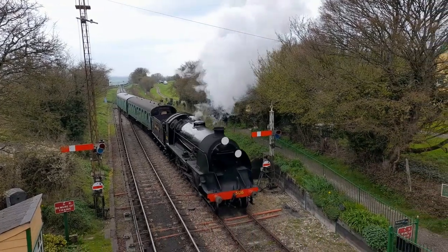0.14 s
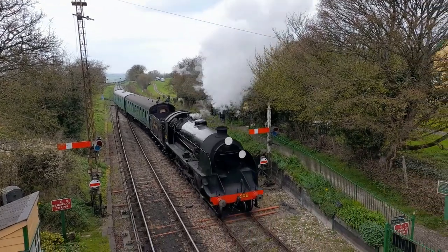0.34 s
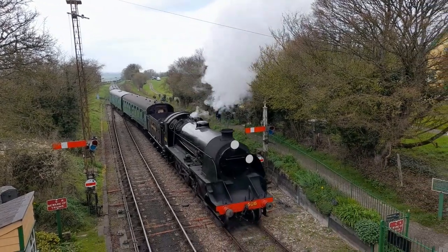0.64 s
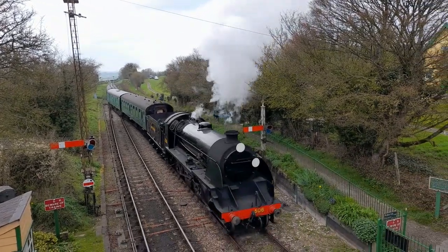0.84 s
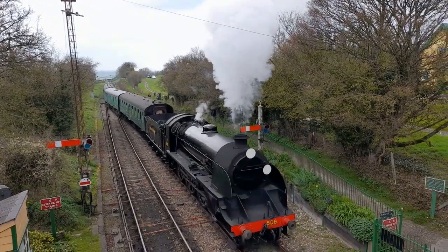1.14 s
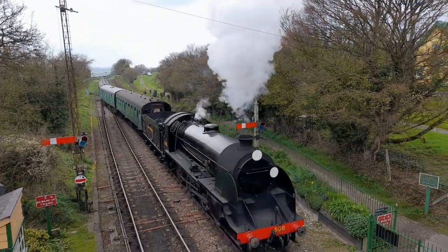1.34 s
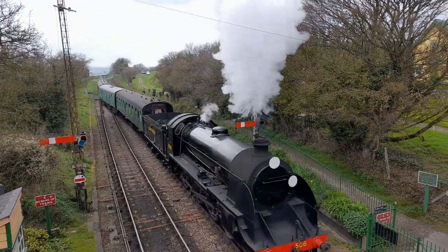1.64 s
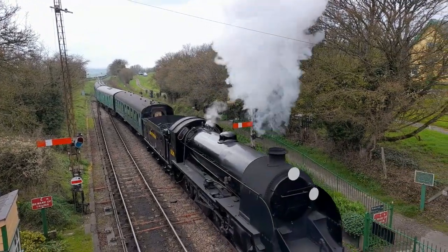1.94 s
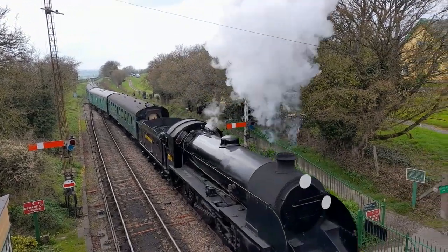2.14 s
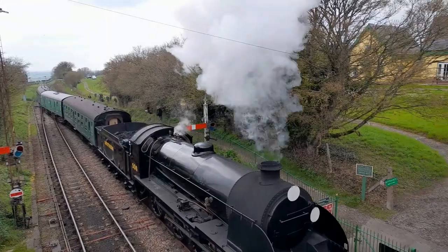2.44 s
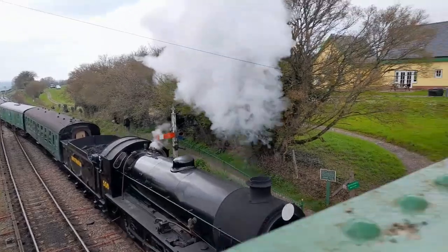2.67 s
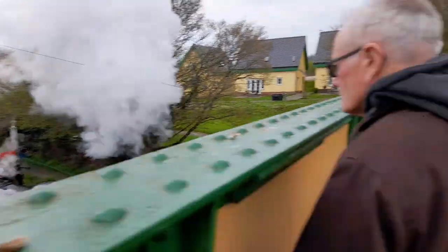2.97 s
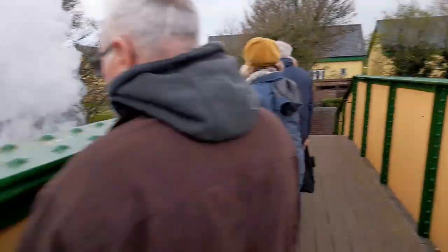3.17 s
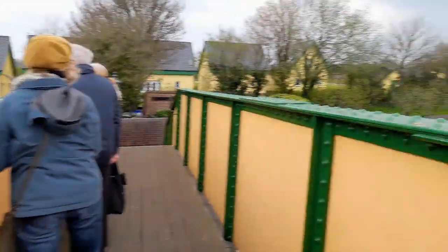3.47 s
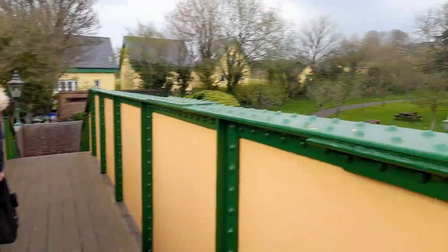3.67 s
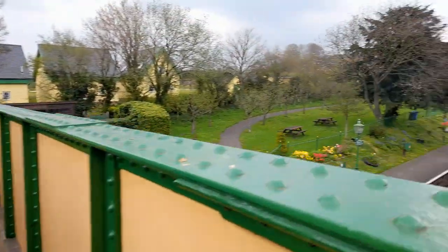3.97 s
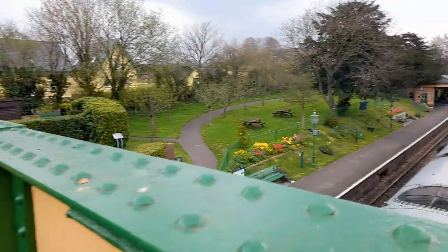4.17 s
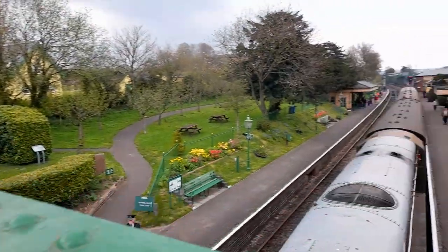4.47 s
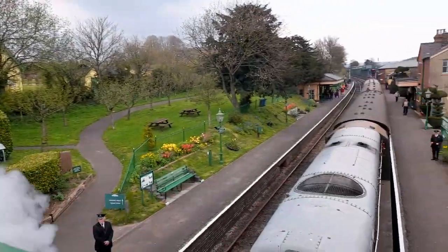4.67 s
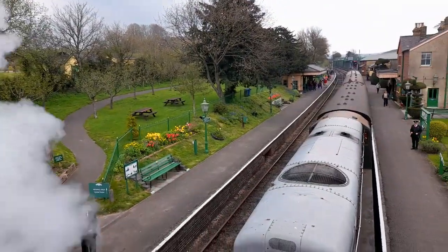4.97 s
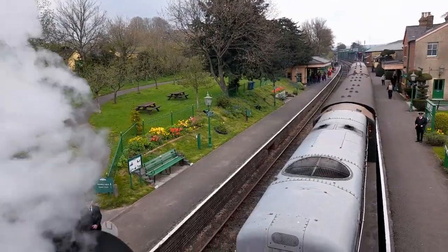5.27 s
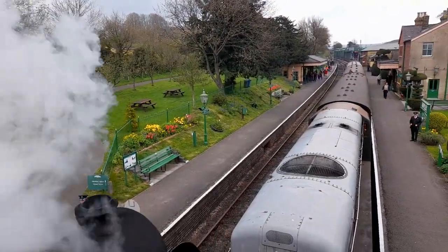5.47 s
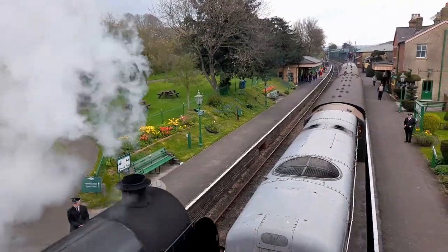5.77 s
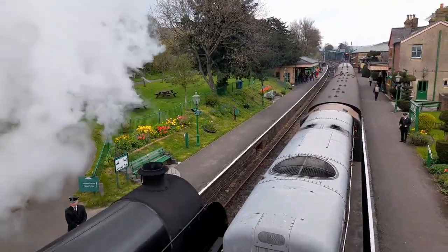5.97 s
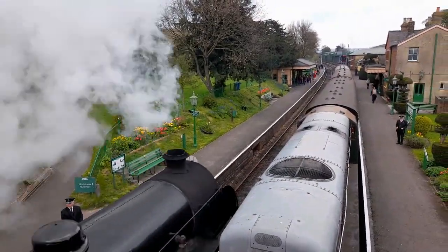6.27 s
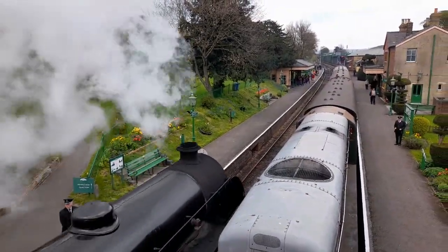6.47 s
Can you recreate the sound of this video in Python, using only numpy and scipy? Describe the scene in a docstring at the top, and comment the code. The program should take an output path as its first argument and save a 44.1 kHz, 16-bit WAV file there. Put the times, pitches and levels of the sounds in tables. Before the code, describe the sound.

A steam train works towards a footbridge outdoors, its exhaust chuffing evenly about three times a second over wheel rumble and steam hiss. Wind buffets the left side of the microphone in the first second. As the engine goes beneath, the deck dulls the treble and the chuffs boom hollowly; then crisp hiss returns. Stereo, handheld on the bridge, close above the track.

```python
"""A railway cutting with a footbridge: a steam locomotive works up to it and passes under, three beats a second.
Each beat is shaped noise, a turbulent blast from the chimney, with a boom that rings on and an echo.
Between beats the wheels rumble, steam leaks hiss and one leak sings, all made from noise.
Wind, strongest at first, buffets the left port (the listener's left side) with short thumps.
The deck screens the blast's treble; the listener's turn shifts the sound between the two ports."""
import sys
import numpy as np
from scipy import signal
from scipy.fft import rfft, irfft, next_fast_len
from scipy.io import wavfile
from scipy.ndimage import uniform_filter1d, map_coordinates

SR = 44100
rng = np.random.default_rng(int(sys.argv[2]) if len(sys.argv) > 2 else 0)


def log_audio(samples):
    """Write samples as a 16-bit WAV file to the path given in sys.argv[1]."""
    # one column per channel
    frames = np.atleast_2d(samples).T
    # limit to full scale, then quantise
    limited = np.clip(frames, -1, 1)
    pcm = np.round(limited * 32767).astype(np.int16)
    wavfile.write(sys.argv[1], SR, pcm)


N = 291942
TIME = np.arange(N) / SR
FREQS = np.fft.rfftfreq(N, 1 / SR)

# how far the bridge deck hides the engine: time_s, share (0-1)
HIDDEN = [(2.35, 0.15), (2.8, 0.34), (3.05, .48), (3.33, 0.97), (3.7, 0.84), (4.6, 0.82), (4.95, 0.3),
          (5.3, 0.08)]
# direction of the engine as the listener turns: time_s, left_lead_ms
BEARING = [(0, 0.13), (1.6, 0.033), (2.55, 0.0043), (3.15, 0.3), (3.7, 0.61), (4.4, 0.43), (5.4, .3),
           (6.62, .13)]
# spectra of the running train: pitch_hz, level_db
DEEP_RUMBLE = [(20, -38), (32, -23), (46, -7.5), (64, -2), (85, -9), (130, -7)]
RUMBLE = [(25, -41), (45, -4), (65, -0.5), (85, -2), (120, 4.5), (170, -6), (230, 0), (310, -3.5),
          (400, -9.5), (700, -38)]
WHEELS = [(220, -7), (350, -9), (520, 6.5), (700, 0), (1000, -6), (1250, -13), (1450, -6), (1850, -12),
          (2400, -16), (3200, -19.5), (6000, -31.5)]
# spectra of the steam round the cylinders and of the fine leak: pitch_hz, level_db
STEAM = [(1000, 4), (2000, -2), (3000, 6.5), (4100, 2), (4700, -2.5), (5400, -7.5), (8000, -20.5),
         (12000, -30), (16000, -34)]
LEAK = [(4000, -7), (6500, -11), (8500, -9), (10000, -1), (11500, -2.5), (13500, 5.5), (14800, -1.5),
        (16000, 0.5)]
# centre of the fine leak's hiss as the jet swings past: time_s, pitch_hz
LEAK_HZ = [(0, 11100), (2.6, 11400), (3.1, 10600), (5.1, 13100), (5.8, 11000)]
# the singing leak, before its swells: time_s, level_db
SINGING = [(0, -44), (1.4, -51), (2.6, -56), (3.95, -44.5), (4.95, -35), (5.3, -42.5), (6.6, -40)]
# spectrum of the wind: pitch_hz, level_db
WIND_LOW = [(20, -41), (50, -9), (130, -6.5), (280, -12), (450, -18), (1000, -36), (3000, -70)]
# gusts on the left port: time_s (middle of the thump), level_db
BUFFETS = [(0.055, -5), (0.116, -1.5), (0.173, -2.5), (0.351, -7.5), (0.402, -5), (0.695, -4.5),
           (0.776, -5.5), (1.103, -1.5)]
# one row for each exhaust beat: start_s, level_db, brightness_db, rasp_hz
BEATS = [(0.168, -22, 0.5, 2800), (.507, -18.5, -3, 2200), (.827, -20, 0, 3263), (1.137, -22, 1, 3200),
         (1.452, -19.5, -0.5, 1560), (1.793, -17.7, 1, 1330), (2.114, -16.4, 0.5, 1470),
         (2.415, -18.5, 1.5, 2860), (2.734, -20.5, 5.5, 2360), (3.078, -19, 2.5, 2860),
         (3.407, -18.5, 0, 2420), (3.716, -19, 0, 3520), (4.035, -18.5, -2, 2250), (4.376, -13.5, -2, 2080),
         (4.698, -15, -3, 3020), (4.999, -15.5, -1.5, 2300), (5.328, -18.5, -0.5, 2920),
         (5.672, -17, -1, 3400), (5.997, -18.5, 0, 1478), (6.311, -20.5, -7.5, 1960)]
# fixed chimney and smokebox resonances: pitch_hz, width_hz, lift_db
CHIMNEY = [(125, 30, 2), (290, 40, 2), (680, 80, 3), (900, 120, 3), (1500, 240, 4), (2150, 90, 4),
           (3050, 400, 3)]
# pitch of the bark, lowest as the chimney enters the bridge: time_s, pitch_hz
BARK_HZ = [(2.73, 660), (3.08, 345), (5.0, 490)]
# spectra of the blast's parts, from low to high: pitch_hz, level_db
BOOM = [(25, -35), (55, -6), (90, -5), (140, -0.5), (220, -0.5), (300, -5.5), (380, -18), (600, -66)]
BARK = [(200, -22), (330, -1), (420, -4), (560, -4.5), (800, -10), (1000, -16), (1400, -57)]
RUSH = [(600, -21), (1000, 4), (1250, 0.5), (1550, 3.5), (1900, 2.5), (2500, 1.5), (3200, -3)]
SIZZLE = [(1800, -79), (2650, 4.5), (3300, 4.5), (4200, -1), (5200, -19), (7500, -25), (9000, -8),
          (11000, -0.5), (13000, -2.5), (16000, -18)]
# early reflections off boiler, ground and bridge: first_delay_ms, last_delay_ms, strength (ratio)
REFLECTIONS = [(2.307, 2.7, 0.038), (6.6, 7.4, 0.14), (13.95, 12.9, 0.12), (21.45, 20.2, 0.16)]
# how long the echo of the cutting takes to fall 60 dB: pitch_hz, fall_s
CUTTING = [(100, 0.29), (300, 0.62), (1000, 0.55), (4000, 0.55), (12000, 0.24)]
# ringing of the hollow under the bridge: pitch_hz, level_db, fall_s (time to fall 60 dB)
BRIDGE = [(166, 1, 0.87), (194, -2, 0.68), (222, 6, 0.097), (293, 4, 0.27)]
# low thuds as the blasts strike the underside of the deck: start_s, level_db
THUDS = [(3.171, -6), (3.435, -10.5), (3.821, -16)]
# the ports' unequal tone: pitch_hz, left_minus_right_db
BALANCE = [(100, 0.5), (400, -1.4), (700, -2), (1300, 0.5), (2600, -1), (4000, 1.5), (5500, 5.5),
           (7800, 12.5), (10000, 5), (13000, 5.5), (15500, 7)]
# the early lift of the left port's treble: pitch_hz, lift_db
BRIGHT_LIFT = [(3500, 0.5), (5000, 6), (6500, 13.5), (8500, 13), (10000, 6), (13000, 5), (15500, 8)]

# the engine's run: its speed, its depth below the listener, and when it is right underneath
SPEED_M_PER_S, DEPTH_M, UNDER_S = 6.54, 6.53, 3.85
# share of direct sound in the open, and the most that the deck takes from it
DIRECT_OPEN, DIRECT_LOST = 0.87, 0.75
# the singing leak: mean pitch, swing either way, swings a second, time of one crest
SINGING_HZ, WARBLE_HZ, WARBLE_PER_S, CREST_S = 2858, 36.2, 4.0, 4.38
# the wind blows steadily at first, then dies away
WIND_DB, WIND_UNTIL_S, WIND_FALL_DB_PER_S = -24, 0.3, 4
# every beat booms near one pitch, give or take a share of it
BOOM_HZ, BOOM_SCATTER = 207.2, 0.11
# bark and rasp stand out more under the deck: lift in the open, further lift when hidden
BARK_OPEN_DB, BARK_HIDDEN_DB = 3.5, 9.5
RASP_WIDTH_HZ, RASP_OPEN_DB, RASP_HIDDEN_DB = 450, 3, 9.5
# the left port sounds brighter at first: when that is gone, and how long it takes to fade
BRIGHT_UNTIL_S, BRIGHT_FADE_S = 1.18, 0.095
EDGE_HZ = 15800  # top of the band


def gain_of(db):
    """Turns decibels into amplitude."""
    return 10 ** (np.asarray(db) / 20)


def evened(x):
    """Scales to an rms (average strength) of 1."""
    return x / np.sqrt(np.mean(x ** 2) + 1e-20)


def read(points, hz):
    """Reads a spectrum table, in straight lines on a log-frequency axis."""
    f, value = np.transpose(points)
    return np.interp(np.log(hz + 1), np.log(f + 1), value)


def curves(rows):
    """Turns each column of a time table into a curve with one value per sample."""
    s, *columns = np.transpose(rows)
    return [np.interp(TIME, s, c) for c in columns]


def add(mix, s, sound):
    """Mixes a sound in, starting at time s."""
    part = mix[..., max(round(s * SR), 0):][..., :sound.shape[-1]]
    part += sound[..., :part.shape[-1]]


def shape(points):
    """Gain of a spectrum table at each frequency, falling steeply beyond its ends."""
    below, above = points[0][0] / 2, points[-1][0] * np.sqrt(2)
    fall_above = 1 + (FREQS / above) ** 4
    fall_below = 1 + (below / (FREQS + 1)) ** 4
    return gain_of(read(points, FREQS)) / fall_above / fall_below


def lift(hz, width, db):
    """The bump that a resonance makes in a spectrum, in dB, at offsets hz from its centre."""
    return db / (1 + (2 * hz / width) ** 2)


def noise(gain):
    """Noise of rms 1 with the given gain at each frequency."""
    size = next_fast_len(N, True)
    gain = np.interp(np.fft.rfftfreq(size, 1 / SR), FREQS, gain)
    waves = rng.standard_normal(len(gain)) + 1j * rng.standard_normal(len(gain))
    return evened(irfft(gain * waves, size)[:N])


def flutter(rate_hz, depth_db):
    """A random gain that wanders, mostly slower than the given rate."""
    wander = np.clip(noise(1 / (1 + (FREQS / rate_hz) ** 4)), -2.5, 2.5)
    return evened(gain_of(depth_db * wander))


def narrow(hz, width_hz):
    """A fuzzy tone: a narrow band of noise that follows a pitch curve."""
    band = 1 / (1 + (2 * FREQS / width_hz) ** 2)
    turn = 2 * np.pi * np.cumsum(hz * np.ones(N)) / SR
    return evened(np.array([noise(band) * np.cos(turn) + noise(band) * np.sin(turn) for port in range(2)]))


def churned(x, depth_db):
    """Eddies in the plume lift and sink patches of the spectrum, some 300 Hz wide and 20 ms long."""
    z = signal.stft(x, SR, nperseg=512, noverlap=384)[2]
    patches = uniform_filter1d(rng.standard_normal(z.shape[1:]), size=4, axis=0)  # blur across pitch
    patches = evened(uniform_filter1d(patches, size=7, axis=1))  # blur across time
    z = z * evened(gain_of(depth_db * patches))
    return signal.istft(z, SR, nperseg=512, noverlap=384)[1][:, :N]


def hidden(t):
    """How far the deck screens the engine at time t, 0-1."""
    return np.clip(np.interp(t, *np.transpose(HIDDEN)), 0, 1)


def behind(t, turn_m=2.2):
    """Near 0 while the engine faces the listener, near 1 once it has gone by."""
    return .5 + .5 * np.tanh(SPEED_M_PER_S * (t - UNDER_S) / turn_m)


def passing(db, spread, screen_db, behind_db):
    """Gain of a part of the train: it falls with distance, and changes behind the deck and once gone by."""
    # spread: 1 for a point source, less for a long one, more for treble that the air absorbs
    distance_m = np.hypot(DEPTH_M, SPEED_M_PER_S * (TIME - UNDER_S))
    level_db = db + screen_db * hidden(TIME) + behind_db * behind(TIME)
    return gain_of(level_db) * (DEPTH_M / distance_m) ** spread


def at_ports(gain, blur_hz=900, compact=1):
    """Engine noise: the direct part reaches the left port first, scattered treble differs in each."""
    lead_ms = curves(BEARING)[0]
    # a spread-out source (low compact) has less of a direction
    direct = np.clip((DIRECT_OPEN - DIRECT_LOST * hidden(TIME) ** 2) * compact, 0, 1)
    jet = noise(gain)
    late = map_coordinates(jet, [np.arange(N) - lead_ms * SR / 1000], order=3, mode="nearest")
    alike = 1 / (1 + (FREQS / blur_hz) ** 2)  # the bass is alike at both ports
    share = np.sum(gain ** 2 * alike) / np.sum(gain ** 2)
    apart = np.array([noise(gain * np.sqrt(1 - alike)) for port in range(2)])
    scattered = np.sqrt(share) * noise(gain * np.sqrt(alike)) + np.sqrt(1 - share) * apart
    return np.sqrt(direct) * np.array([jet, late]) + np.sqrt(1 - direct) * scattered


def rolling():
    """Rumble of the heavy train, roar of wheels on rail, and a faint ring of the running gear."""
    deep = passing(db=-38.0, spread=0.22, screen_db=6, behind_db=-5.5) * at_ports(shape(DEEP_RUMBLE))
    rumble = passing(db=-28.5, spread=0.042, screen_db=1.05, behind_db=2.5) * at_ports(shape(RUMBLE))
    rumble = rumble * flutter(33, 1.0)
    wheels = passing(db=-38.0, spread=0.047, screen_db=-3.5, behind_db=4.5) * at_ports(shape(WHEELS))
    wheels = wheels * flutter(45, 1.0)
    ring = passing(db=-41.5, spread=0.59, screen_db=-21, behind_db=-2) * narrow(2140, 110)
    return deep + rumble + wheels + ring


def leaks(beam_hz=2000, beam_db=8, surge_db=4, surge_lag_s=0.037, surge_length_s=0.048):
    """Steam escapes round the cylinders, surging with every stroke, and hisses from a fine leak."""
    surge = sum(np.exp(-((TIME - row[0] - surge_lag_s) / surge_length_s) ** 2) for row in BEATS)
    steam = gain_of(surge_db * surge) * at_ports(shape(STEAM), compact=0.57) * flutter(29.5, 1.0)
    steam = steam * passing(db=-36.0, spread=0.53, screen_db=-15, behind_db=3.5)
    # a broad bump moves through the hiss as the jet swings past
    hz, t, z = signal.stft(at_ports(shape(LEAK), compact=0.2), SR, nperseg=512)
    centre_hz = np.interp(t, *np.transpose(LEAK_HZ))
    z = z * gain_of(beam_db * np.exp(-((hz[:, None] - centre_hz) / beam_hz) ** 2))
    hiss = evened(signal.istft(z, SR, nperseg=512)[1][:, :N]) * flutter(42, 0.37)
    hiss = hiss * passing(db=-23, spread=1.29, screen_db=-29.0, behind_db=0.0)
    return churned(steam, depth_db=3.0) + churned(hiss, depth_db=1.8)


def singing(swell_db=1.5):
    """A leak sings at a joint: a fuzzy tone whose pitch and level rise and fall together."""
    warble = np.cos(2 * np.pi * WARBLE_PER_S * (TIME - CREST_S))
    pitch_hz = (SINGING_HZ + WARBLE_HZ * warble) * flutter(7.7, 0.0306)
    level = gain_of(curves(SINGING)[0] + swell_db * warble)
    return level * narrow(pitch_hz, 73) * flutter(9.1, 3.3)


def wind(swing_hz=140, length_s=0.0023, right_db=-17):
    """Eddies, chiefly at the left port: a lumpy rumble and a few short thumps."""
    level_db = WIND_DB - WIND_FALL_DB_PER_S * np.maximum(TIME - WIND_UNTIL_S, 0)
    left = gain_of(level_db) * noise(shape(WIND_LOW)) * flutter(25, 5.1)
    t = np.arange(-SR // 25, SR // 25) / SR
    for (s, db), (phase, size) in zip(BUFFETS, rng.random((len(BUFFETS), 2))):
        thump_hz = swing_hz * (0.92 + .5 * size)  # each thump has its own pitch
        eddy = np.exp(-(t / length_s) ** 2) * np.cos(2 * np.pi * (thump_hz * t + phase))
        add(left, s + t[0], gain_of(db) * eddy)
    return np.array([left, gain_of(right_db) * left])


def blasts(spectrum, levels_db, delay_s, rise_s, hold_s, decay_s, rough_db, rough_hz, ring_db=10, lumpy_db=1.66):
    """One part of every beat: the valve opens, the jet roars in the chimney, the cylinder empties."""
    chimney_db = sum(lift(FREQS - hz, width, db) for hz, width, db in CHIMNEY)
    jet = at_ports(shape(spectrum) * gain_of(chimney_db)) * flutter(rough_hz, rough_db)
    t = np.arange(int(.3 * SR)) / SR
    hz = np.fft.rfftfreq(len(t), 1 / SR)
    # a negative delay means that the flow is already under way at the start
    age = t - delay_s
    opening = np.sin(np.pi / 2 * np.clip(age / rise_s, 0, 1)) ** 2
    flow = opening * np.exp(-np.maximum(age - rise_s - hold_s, 0) / decay_s)
    out = np.zeros((2, N))
    booms_hz = BOOM_HZ * (1 + BOOM_SCATTER * rng.uniform(-1.03, 1, len(BEATS)))
    for (s, _, _, rasp_hz), db, boom_hz in zip(BEATS, levels_db, booms_hz):
        bark_hz = np.interp(s, *np.transpose(BARK_HZ))
        # each slug of steam stirs its own resonances, and its eddies make the spectrum lumpy
        colour_db = lift(hz - boom_hz, 50, ring_db)
        colour_db = colour_db + lift(hz - bark_hz, 64, BARK_OPEN_DB + BARK_HIDDEN_DB * hidden(s))
        colour_db = colour_db + lift(hz - rasp_hz, RASP_WIDTH_HZ, RASP_OPEN_DB + RASP_HIDDEN_DB * hidden(s))
        colour_db = colour_db + lumpy_db * evened(uniform_filter1d(rng.standard_normal(len(hz)), size=45))
        piece = jet[:, round(s * SR):][:, :len(t)]
        puff = irfft(rfft(piece, len(t), axis=1) * gain_of(colour_db), len(t), axis=1)
        add(out, s, gain_of(db) * evened(puff * flow))
    return out


def exhaust(boom_tilt=-0.48, sizzle_tilt=1.3, rush_screen_db=-15, sizzle_screen_db=-20,
            boom_rear_db=-1.04, bark_rear_db=1):
    """The sizzle rises fastest in each beat, the boom builds slowest; the deck screens only the treble."""
    s, strength_db, bright_db, _ = np.transpose(BEATS)
    boom_db = strength_db + boom_tilt * bright_db + boom_rear_db * behind(s)
    bark_db = strength_db + bark_rear_db * behind(s)
    rush_db = strength_db + bright_db + rush_screen_db * hidden(s)
    sizzle_db = strength_db + sizzle_tilt * bright_db + sizzle_screen_db * hidden(s)
    boom = blasts(BOOM, boom_db, delay_s=0.00045, rise_s=0.061, hold_s=0.025, decay_s=0.037,
                  rough_db=0.5, rough_hz=83.0)
    bark = blasts(BARK, bark_db, delay_s=-0.011, rise_s=0.052, hold_s=0.03, decay_s=0.028,
                  rough_db=0.5, rough_hz=150)
    rush = blasts(RUSH, rush_db, delay_s=-0.0024, rise_s=0.041, hold_s=0.022, decay_s=0.037,
                  rough_db=1.5, rough_hz=199)
    sizzle = blasts(SIZZLE, sizzle_db, delay_s=-0.0022, rise_s=0.031, hold_s=0.015, decay_s=0.041,
                    rough_db=2.5, rough_hz=200)
    treble = churned(gain_of(-11.0) * rush + gain_of(-15) * sizzle, depth_db=2.5)
    return gain_of(-3.0) * boom + gain_of(-8.0) * bark + treble


def reflected(x):
    """Nearby surfaces add short echoes whose delays drift as the engine moves; the bass passes round them."""
    treble = signal.sosfilt(signal.butter(1, 350, "highpass", fs=SR, output="sos"), x)
    out = x.copy()
    for first_ms, last_ms, strength in REFLECTIONS:
        then = TIME - np.linspace(first_ms, last_ms, N) / 1000
        out += strength * np.array([map_coordinates(port, [then * SR], order=3) for port in treble])
    return out


def cutting(x):
    """Banks, trees and buildings scatter the beats back; the bass returns alike at both ports."""
    size = SR // 2
    # sparse random echoes, about 2000 a second, none sooner than 30 ms
    taps = rng.standard_normal((2, size)) * (rng.random((2, size)) < 2000 / SR) * (TIME[:size] > .03)
    hz, t, z = signal.stft(taps, SR, nperseg=256)
    z = np.array([z[0], np.where((hz < 500)[:, None], z[0], z[1])])
    fading = gain_of(-60 * t / read(CUTTING, hz)[:, None])
    tail = signal.istft(z * fading, SR, nperseg=256)[1]
    return signal.fftconvolve(x, tail / np.linalg.norm(tail[0]), axes=1)[:, :N]


def bridge(x, nearest_s=3.32, spread_s=1.0, drive_db=-7):
    """Blasts close under the bridge make the space between its girders boom on."""
    t = TIME[:SR // 2]
    ring = sum(gain_of(db - 60 * t / fall_s) * np.sin(2 * np.pi * hz * t) for hz, db, fall_s in BRIDGE)
    near = x.mean(0) * np.exp(-((TIME - nearest_s) / spread_s) ** 2)
    return gain_of(drive_db) * np.std(near) * evened(signal.fftconvolve(near, ring)[:N])


def thuds(ring_hz=203, swell_s=0.0091):
    """Blasts strike the deck: each thud swells within two cycles and dies in a few more."""
    t = TIME[:SR // 8]
    thud = t / swell_s * np.exp(1 - t / swell_s) * np.sin(2 * np.pi * ring_hz * t)
    out = np.zeros(N)
    for s, db in THUDS:
        add(out, s, gain_of(db) * thud)
    return out


def scene():
    """The train, heard through two ports of unequal tone, and the wind, chiefly on the left one."""
    beats = exhaust()
    train = reflected(beats + rolling() + leaks() + singing())
    train = train + gain_of(-19.0) * cutting(beats) + bridge(beats) + thuds()
    ratio = gain_of(read(BALANCE, FREQS))
    ports = np.array([ratio, np.ones_like(ratio)]) * np.sqrt(2 / (1 + ratio ** 2))  # keeps the total power
    left, right = gain_of(-0.29) * irfft(rfft(train, axis=1) * ports, N, axis=1)
    fade = np.clip((BRIGHT_UNTIL_S - TIME) / BRIGHT_FADE_S, 0, 1)
    sheen = fade * irfft(rfft(left) * (gain_of(read(BRIGHT_LIFT, FREQS)) - 1), N)
    return np.array([left + sheen, right]) + wind()


def record(dry):
    """Rounds off peaks near full scale, then removes what lies above the top of the band."""
    rounded = dry / (1 + dry ** 6) ** (1 / 6)
    low_pass = signal.firwin(1023, EDGE_HZ, window=("kaiser", 11), fs=SR)
    return signal.oaconvolve(rounded, low_pass[None], "same")


dry = scene()
out = record(dry)
log_audio(out)
```